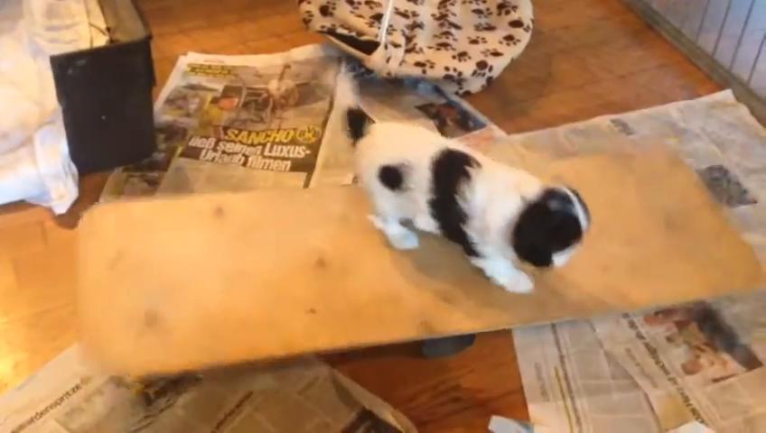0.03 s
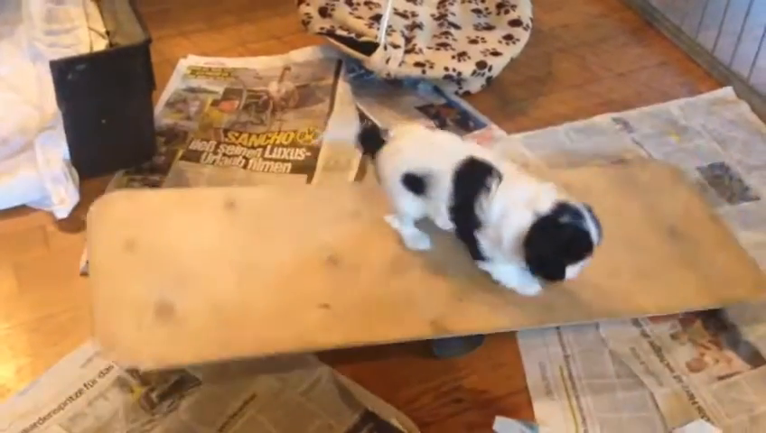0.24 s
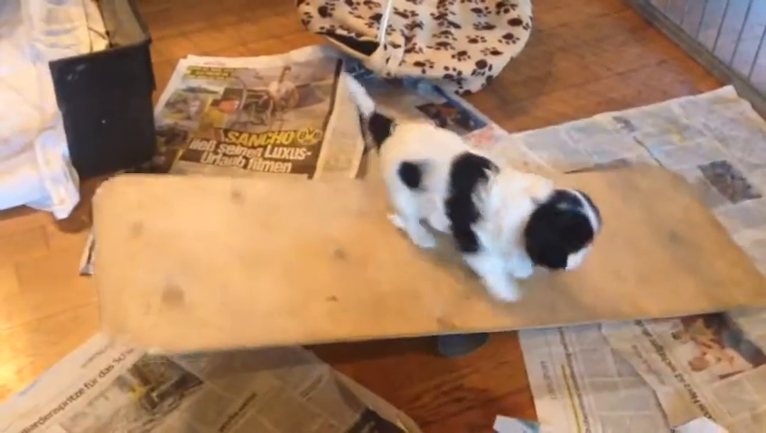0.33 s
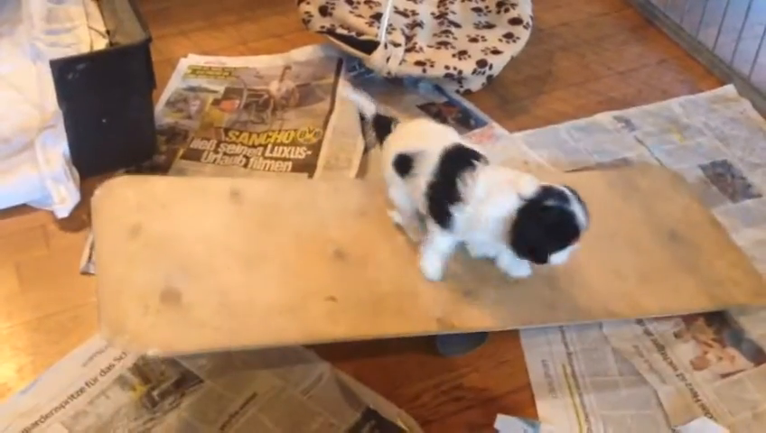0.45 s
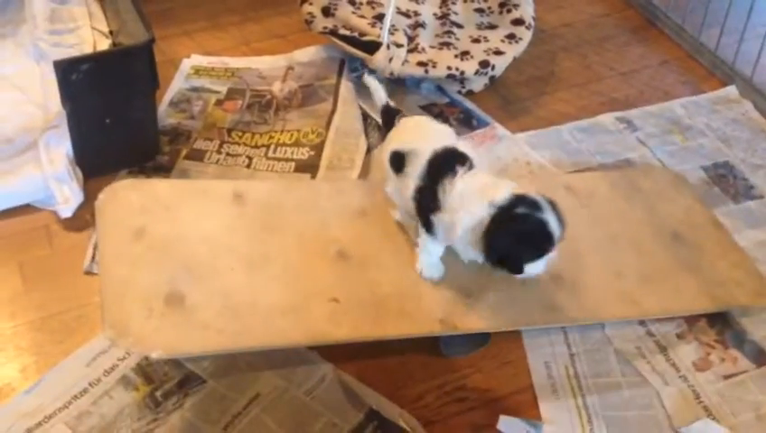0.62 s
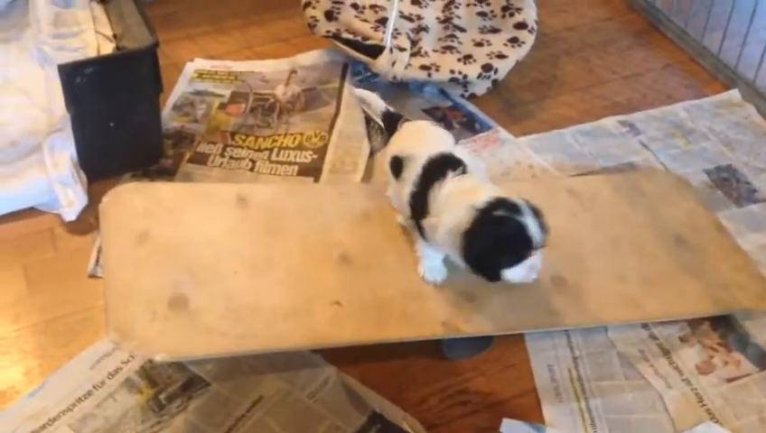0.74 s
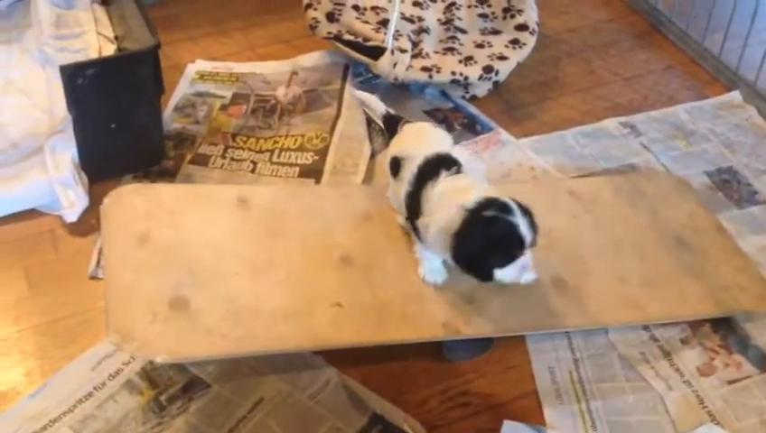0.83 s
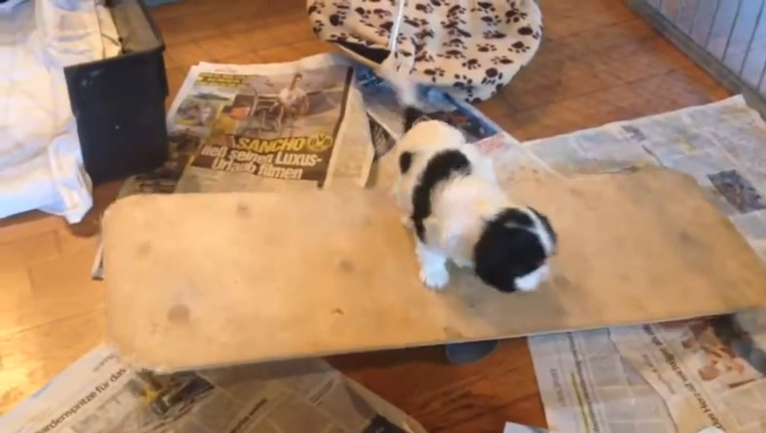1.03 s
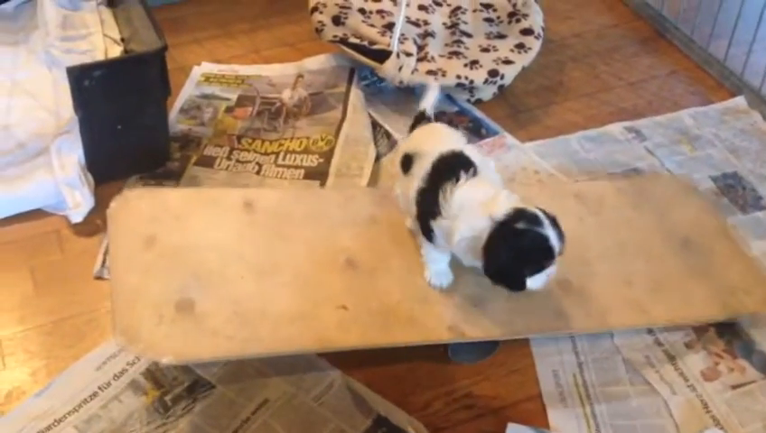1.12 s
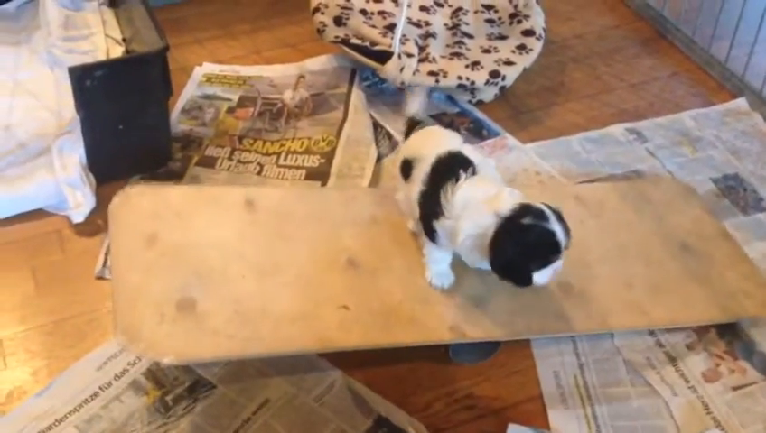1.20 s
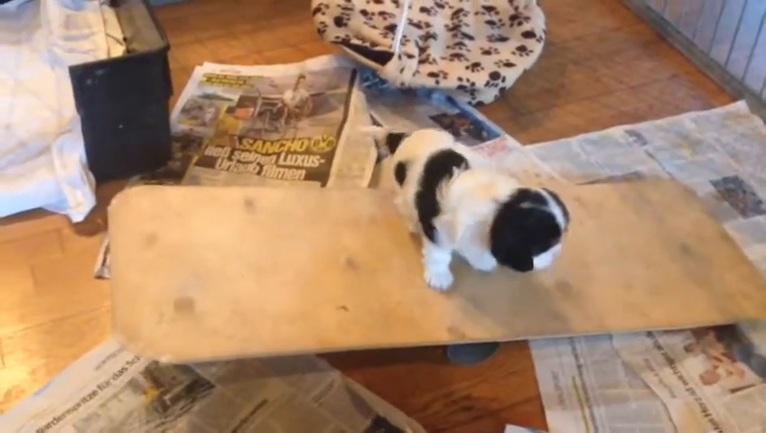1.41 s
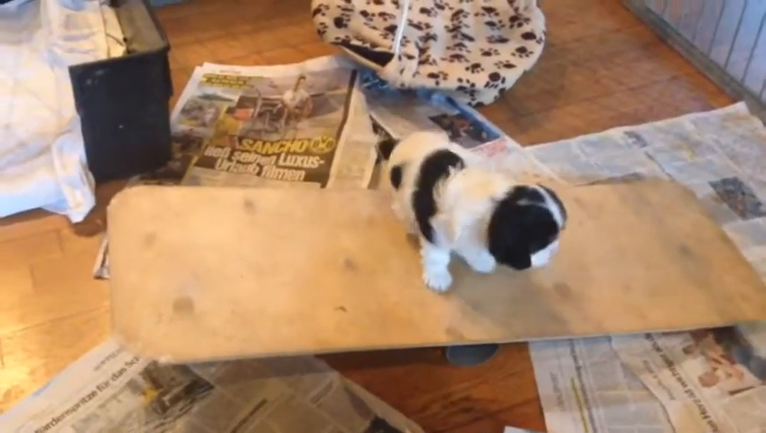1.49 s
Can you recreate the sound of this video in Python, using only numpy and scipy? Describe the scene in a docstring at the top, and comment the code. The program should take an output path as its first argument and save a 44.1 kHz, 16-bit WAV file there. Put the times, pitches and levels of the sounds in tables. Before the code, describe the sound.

A wooden board knocks loudly on the floor twice in quick succession, rattling as its edge bounces; light claw ticks and soft paw steps follow, then a duller knock. Reverberant room, single-channel microphone, slightly muted top.

```python
"""A wooden wobble board knocks on the floor three times as a puppy shifts its weight on it.
Each knock is an impulse and dense damped noise, a narrow-band crack, plank modes and a room tail.
Claws tick (fading noise bursts), paws scuff (grainy band noise) and steps thud (dull, reverberant blows).
Newspaper rustles (crackling noise of changing level) over the quiet air of the room (steady noise)."""
import sys
import numpy as np
from scipy import signal
from scipy.fft import rfft, irfft
from scipy.io import wavfile
from scipy.ndimage import uniform_filter1d

SR = 44100
rng = np.random.default_rng(int(sys.argv[2]) if len(sys.argv) > 2 else 0)


def unload_audio(sound):
    """Save the sound as a 16-bit wav file, at the path given as the first command line argument."""
    columns = np.transpose(np.atleast_2d(sound))
    # keep every value between -1 and 1, then stretch to whole-number steps
    steps = np.round(np.clip(columns, -1, 1) * 32767)
    wavfile.write(sys.argv[1], SR, steps.astype(np.int16))


N = 68355


def undb(db):
    """Level law: 20 dB is a factor of ten in amplitude."""
    return 10 ** (np.asarray(db) / 20)


def unit(x):
    """Energy normalisation: the squares sum to one."""
    return x / np.sqrt(np.sum(x ** 2))


def curve(points, hz):
    """Interpolation on the logarithmic frequency axis of (Hz, value) points."""
    p = np.array(points, float)
    return np.interp(np.log(hz), np.log(p[:, 0]), p[:, 1])


def colour(x, db_at):
    """Minimum-phase filtering: a folded cepstrum turns a gain in dB over frequency into a causal response."""
    size = 4096
    hz = np.maximum(np.fft.rfftfreq(size, 1 / SR), 1)
    cepstrum = irfft(np.log(undb(db_at(hz))))
    cepstrum[1:size // 2] *= 2
    cepstrum[size // 2 + 1:] = 0
    response = irfft(np.exp(rfft(cepstrum)))
    return signal.fftconvolve(x, response)[:N]


def high_pass(x, hz):
    """Fourth-order Butterworth filtering: the bass below the corner is cut steeply."""
    return signal.sosfilt(signal.butter(4, hz, "high", fs=SR, output="sos"), x)


def at(x, start_s):
    """Pure delay: a sound is moved to its start time."""
    return np.concatenate([np.zeros(max(int(start_s * SR), 0)), x])[:N]


def fade(t60_s):
    """Exponential decay: the amplitude falls by 60 dB in t60."""
    return np.exp(-np.log(1000) * np.arange(N) / SR / t60_s)


def even(x):
    """Spectral whitening: broad colour is levelled, fine ripple stays; unit energy in the first half of N."""
    spectrum = rfft(x)
    smoothing_hz = 160
    power = uniform_filter1d(np.abs(spectrum) ** 2, int(smoothing_hz * N / SR))
    white = irfft(spectrum / np.sqrt(power), N)
    return unit(white * (np.arange(N) < N * 0.5))


def burst(t60_s):
    """Damped random vibration: fading white noise of unit energy."""
    return even(rng.standard_normal(N) * fade(t60_s))


def grains():
    """Shot noise: random tiny crackles of uneven size overlap densely; rms one."""
    grains_per_s, spread_db, t60_s = 700, 2, 0.023
    hits = rng.random(N) < grains_per_s / SR
    sizes = undb(spread_db * np.minimum(rng.exponential(size=N), np.pi))
    power = np.abs(signal.fftconvolve(hits * sizes ** 2, fade(t60_s) ** 2)[:N])
    return unit(np.sqrt(power) * rng.standard_normal(N)) * np.sqrt(N)


# Reverberation time of the room by band: centre_hz [Hz], t60_s [s]
ROOM_DECAY = [(100, 0.92), (250, 0.89), (500, 0.69), (1000, 0.8), (2000, 0.75), (4000, 0.64), (9000, 0.72)]


def room():
    """Reverberation: sparse wall reflections over a diffuse tail whose bands decay at their own rates."""
    rise_s = 0.0045
    reflections_per_s, reflection_db, reflection_t60_s = 340, -8.5, 0.63
    t = np.arange(N) / SR
    hz = np.maximum(np.fft.rfftfreq(N, 1 / SR), 1)
    noise = rfft(rng.standard_normal(N))
    tail = 0
    for centre_hz, t60_s in ROOM_DECAY:
        # each band is a triangle that reaches zero at its neighbours' centres
        share = curve([(f, f == centre_hz) for f, _ in ROOM_DECAY], hz)
        tail = tail + irfft(noise * share, N) * fade(t60_s)
    rise = 1 - np.exp(-t / rise_s)
    hits = rng.random(N) < reflections_per_s / SR
    walls = hits * rng.choice([-1, 1], N) * fade(reflection_t60_s)
    return even(unit(tail * rise) + undb(reflection_db) * unit(walls * rise))


# Colour of the newspaper: frequency_hz [Hz], relative spectrum level_db [dB]
PAPER_SPECTRUM = [(40, -43), (100, -32), (300, -9), (1000, -5.5), (3000, -8), (5000, -17.5), (8000, -13),
                  (10500, -24.5)]
# Level of the newspaper rustle over time: time_s [s], level_db [dB]
RUSTLE_LEVEL = [(0, -63), (0.072, -66), (.13, -74), (.2, -65.5), (.6, -63), (.88, -75.5), (.96, -63),
                (1.1, -68.5), (1.23, -64.5), (1.4, -61.5), (1.55, -70)]
# Colour of the quiet air: frequency_hz [Hz], relative spectrum level_db [dB]
AIR_SPECTRUM = [(30, -41), (80, -25), (150, -7), (300, -5.5), (700, -5), (1500, -14), (3200, -7),
                (5000, -13), (8000, -21.5), (10500, -30)]


def background():
    """Superposition of noises: newspaper crackles of changing level over the steady quiet air."""
    air_db = -62.5
    rustle_db = np.interp(np.arange(N) / SR, *np.array(RUSTLE_LEVEL).T)
    crinkle = unit(colour(grains(), lambda hz: curve(PAPER_SPECTRUM, hz)))
    paper = undb(rustle_db) * np.sqrt(N) * crinkle
    hiss = unit(colour(rng.standard_normal(N), lambda hz: curve(AIR_SPECTRUM, hz)))
    air = undb(air_db) * np.sqrt(N) * hiss
    return paper + air


# Scuffs of paws and of the board on the paper: start_s [s], length_s [s], relative level_db [dB],
# centre_hz [Hz], skirt_db [dB per octave]
SCUFF_EVENTS = [(0.0, 0.029, -52.5, 2780, 7.5), (0.161, 0.018, -43.5, 4200, 24),
                (0.165, 0.11, -49, 1500, 11), (0.31, 0.034, -45, 3600, 23), (0.903, 0.034, -50, 3200, 10.5),
                (0.909, .025, -42, 1700, 13), (1.0185, 0.027, -49.5, 2270, 7),
                (1.043, 0.082, -55.5, 3800, 8.5), (1.266, 0.012, -52.5, 5860, 16),
                (1.4, 0.025, -48, 4100, 26), (1.522, 0.022, -47, 5200, 9.5),
                (1.525, 0.065, -45.5, 2200, 13)]


def paws():
    """Sliding friction: short gritty slides, each a band of grains, with their echo in the room."""
    attack_share, low_cut_hz, room_db = 0.3, 400, 0.5
    t = np.arange(N) / SR
    dry = 0
    for start_s, length_s, level_db, centre_hz, skirt_db in SCUFF_EVENTS:
        envelope = np.interp((t - start_s) / length_s, [0, attack_share, 1], [0, 1, 0])
        slide = colour(grains() * envelope, lambda hz: -skirt_db * np.abs(np.log2(hz / centre_hz)))
        dry = dry + 2 * undb(level_db) * slide
    dry = high_pass(dry, low_cut_hz)
    return dry + undb(room_db) * signal.fftconvolve(dry, room())[:N]


# Dense vibration of the wood: frequency_hz [Hz], relative spectrum level_db [dB]
WOOD_SPECTRUM = [(30, -50.5), (75, -33.5), (115, -21.5), (165, -6.5), (260, -3.5), (480, -2.5), (680, -3),
                 (850, -2), (1100, -1), (1350, -4.5), (1650, -5.5), (2200, -9.5), (2800, -8.5),
                 (3500, -11.5), (4200, -13), (5500, -18.5), (7500, -19.5), (10500, -29.5)]


def contact(hz, corner_hz):
    """Contact stiffness: wood spectrum in dB; a softer contact, with a lower corner, cuts the treble."""
    return curve(WOOD_SPECTRUM, hz) - 10 * np.log10(1 + (hz / corner_hz) ** 3)


def blow():
    """Impact excitation: a sharp contact impulse with the short, dense, quickly damped ring of wood."""
    click_db, wood_db, wood_t60_s = 12.5, 17.5, 0.072
    return undb(click_db) * signal.unit_impulse(N) + undb(wood_db) * burst(wood_t60_s)


# Soft paw steps on the plank: start_s [s], relative level_db [dB]
STEP_EVENTS = [(0.0, -42.5), (0.167, -29.5), (0.7355, -31), (1.0113, -38.5)]


def steps():
    """Soft impact: padded paws press on the plank, dull little thuds that linger in the room."""
    corner_hz, room_db = 350, 17
    dry = 0
    for start_s, level_db in STEP_EVENTS:
        thud = blow() + undb(room_db) * room()
        dry = dry + at(undb(level_db) * thud, start_s)
    return colour(dry, lambda hz: contact(hz, corner_hz))


# Colour of the claws: frequency_hz [Hz], relative spectrum level_db [dB]
CLAW_SPECTRUM = [(100, -51), (1000, -10.5), (2500, -8), (4600, -2.5), (7000, -4), (9500, -10), (11000, -39)]
# Claw ticks: start_s [s], relative level_db [dB]
TICK_EVENTS = [(0.146, -26), (0.564, -18), (0.672, -22), (0.7356, -15.5), (0.801, -22.5), (1.0114, -13),
               (1.2526, -26), (1.4137, -22), (1.5238, -18.5)]


def claws():
    """Hard, light impact: small bright ticks on the wood, convolved with the room."""
    t60_s, room_db = 0.03, -1.5
    dry = sum(at(undb(level_db) * burst(t60_s), start_s) for start_s, level_db in TICK_EVENTS)
    dry = colour(dry, lambda hz: curve(CLAW_SPECTRUM, hz))
    return dry + undb(room_db) * signal.fftconvolve(dry, room())[:N]


# Ringing modes of the plank in the room: pitch_hz [Hz], t60_s [s],
# then the relative level_db [dB] in the first, second and third knock
PLANK_MODES = [(168, 0.4, -31, -34, -38), (197, 0.4, -37, -43, -39), (226, 0.62, -38, -37, -46),
               (257, 0.4, -28, -29, -37), (316, 0.62, -33, -32, -37), (339, 0.4, -29, -26, -31),
               (372, 0.5, -30, -33, -39), (417, 0.5, -26, -35, -38), (476, 0.3, -26, -32, -36),
               (507, 0.3, -18, -29, -37), (541, 0.4, -25, -32, -36), (591, 0.4, -34, -33, -35),
               (625, 0.3, -29, -27, -39), (715, 0.4, -28, -27, -40), (762, 0.62, -31, -36, -46),
               (794, 0.3, -27, -29, -35), (843, 0.3, -40, -31, -40), (915, 0.3, -35, -26, -46),
               (1047, 0.5, -33, -31, -43), (1106, 0.3, -21, -31, -42), (1265, 0.3, -33, -36, -43),
               (1361, 0.62, -36, -44, -54), (1583, 0.4, -41, -34, -53), (1734, 0.3, -40, -33, -49),
               (1982, 0.3, -41, -36, -57)]


def ring(index):
    """Modal superposition: decaying sines sustained in the room, plus a weaker, brief ring of the plank."""
    modes_db, low_cut_hz, rise_s = 1, 136, 0.0007
    plank_db, plank_t60_s = -20.5, 0.02
    t = np.arange(N) / SR
    plank = undb(plank_db) * fade(plank_t60_s)
    modes = 0
    for pitch_hz, t60_s, *levels_db in PLANK_MODES:
        tone = np.sin(2 * np.pi * (pitch_hz * t + rng.random()))  # random phase
        modes = modes + undb(levels_db[index]) * (fade(t60_s) + plank) * tone
    return undb(modes_db) * high_pass(modes * (1 - np.exp(-t / rise_s)), low_cut_hz)


# Sharp crack of the hard edge: frequency_hz [Hz], relative spectrum level_db [dB]
CRACK_SPECTRUM = [(100, -41), (1500, -25.5), (2500, -21.5), (2900, 3), (3100, 3), (3350, 4.5), (3600, 7.5),
                  (3950, -16), (4600, -20), (6000, -21.5), (10500, -48)]


def crack(walls):
    """Narrow-band radiation: the hard edge gives a brief noise burst with a little of the room."""
    level_db, t60_s, room_db = 2.5, 0.022, -19.5
    sound = burst(t60_s) + undb(room_db) * walls
    return undb(level_db) * colour(sound, lambda hz: curve(CRACK_SPECTRUM, hz))


def thump():
    """Low-frequency displacement: a push of air as a fast-decaying sine."""
    pitch_hz, t60_s = 28, 0.04
    return fade(t60_s) * np.sin(2 * np.pi * pitch_hz * np.arange(N) / SR)


# Colour of the knock in the room: frequency_hz [Hz], gain_db [dB]
TAIL_COLOUR = [(100, 0), (200, 2), (500, 3.5), (1000, -1), (2000, -0.5), (3000, -3), (4500, -0.5),
               (9000, -2)]
# Knocks: start_s [s], relative level_db of blow and room [dB], contact corner_hz [Hz],
# then relative bass_db, crack_db, room_db and thump_db [dB]
KNOCK_EVENTS = [(0.2280, 3, 3760, 0.5, -2.5, 5.5, -32), (0.4364, 3, 3170, 0, 7.5, 5.5, -40.5),
                (1.2748, -5, 1180, 2, -19.5, 4.5, -57)]


def knocks():
    """Impact radiation: blow and room share a contact spectrum; crack, plank modes and thump add to them."""
    room_gain_db, bass_corner_hz = 16, 240
    out = 0
    for k, (start_s, level_db, corner_hz, bass_db, crack_db, room_db, thump_db) in enumerate(KNOCK_EVENTS):
        walls = room()
        tail = colour(walls, lambda hz: curve(TAIL_COLOUR, hz))
        hit = blow() + undb(room_gain_db + room_db) * tail

        def spectrum(hz):
            """Low-shelf equalisation: the bass adjustment fades out above its corner."""
            return contact(hz, corner_hz) + bass_db / (1 + (hz / bass_corner_hz) ** 2)

        hit = undb(level_db) * colour(hit, spectrum)
        knock = hit + undb(crack_db) * crack(walls) + ring(k) + undb(thump_db) * thump()
        out = out + at(knock, start_s)
    return out


# The edge slaps down again after a knock: start_s [s], relative level_db [dB], contact corner_hz [Hz]
BOUNCE_EVENTS = [(0.2335, -5.5, 1340), (0.2378, -3, 1100), (0.2418, -2, 1000), (0.2732, -8.5, 1326),
                 (0.359, -6.5, 1360), (0.4505, -15, 2460), (1.2828, -29, 1400)]


def bounces():
    """Repeated impact: the edge slaps down again in softer blows without a room tail."""
    out = 0
    for start_s, level_db, corner_hz in BOUNCE_EVENTS:
        slap = colour(blow(), lambda hz: contact(hz, corner_hz))
        out = out + at(undb(level_db) * slap, start_s)
    return out


def scene():
    """Linear superposition: all the sources add in one channel."""
    return (background() + paws() + steps() + claws() + knocks() + bounces())[None]


def record(dry):
    """Elliptic low-pass filtering: the recorder cuts the top."""
    top_hz, ripple_db, stop_db = 10600, 0.2, 70
    return signal.sosfilt(signal.ellip(10, ripple_db, stop_db, top_hz, fs=SR, output="sos"), dry)


dry = scene()
out = record(dry)
unload_audio(out)
```